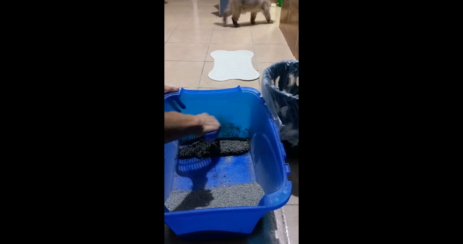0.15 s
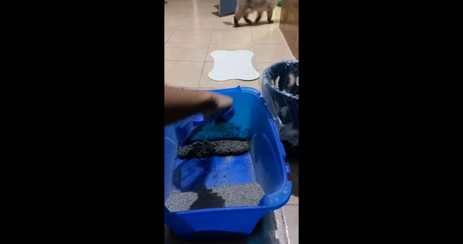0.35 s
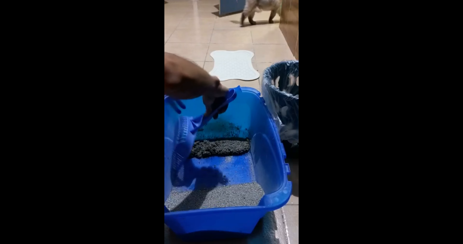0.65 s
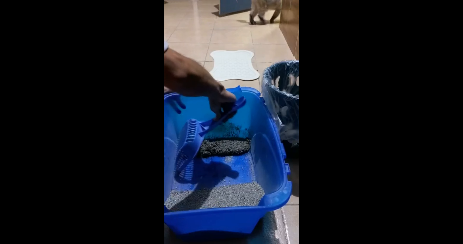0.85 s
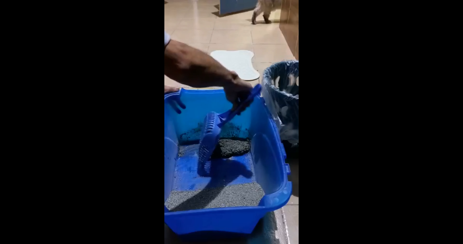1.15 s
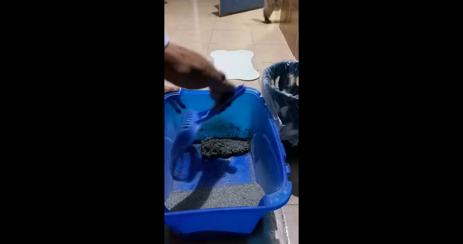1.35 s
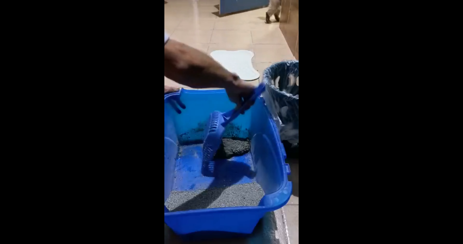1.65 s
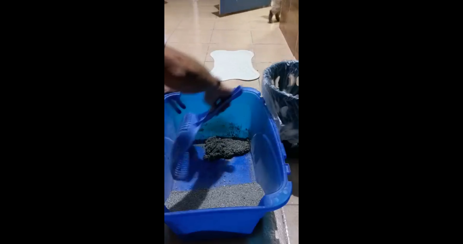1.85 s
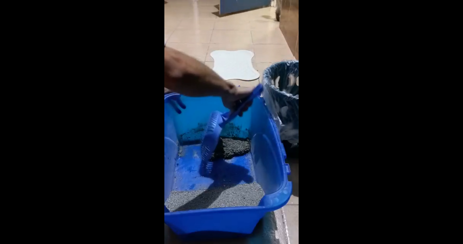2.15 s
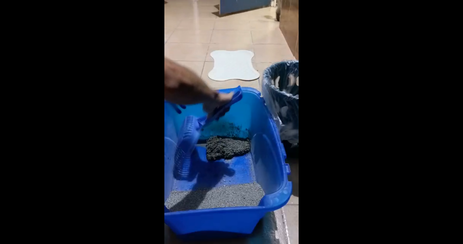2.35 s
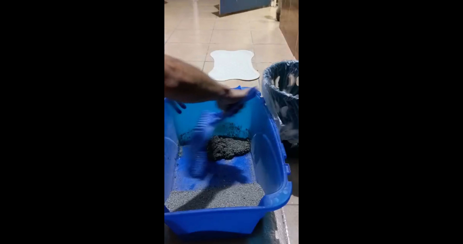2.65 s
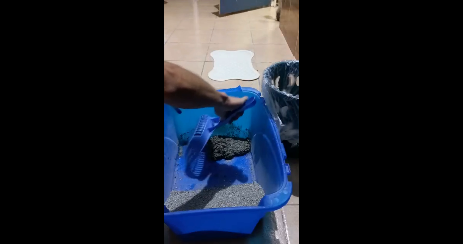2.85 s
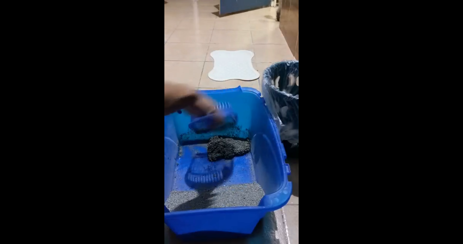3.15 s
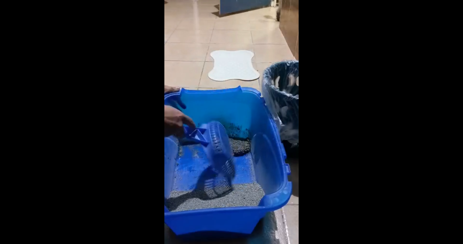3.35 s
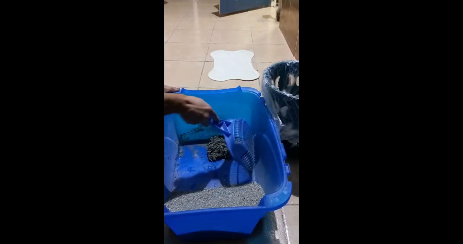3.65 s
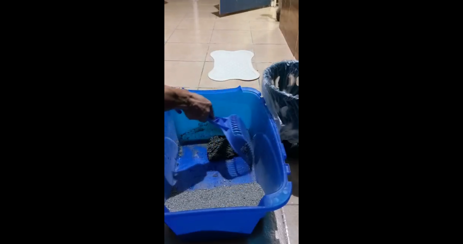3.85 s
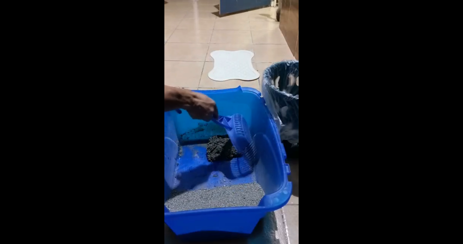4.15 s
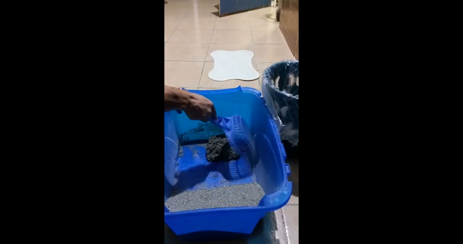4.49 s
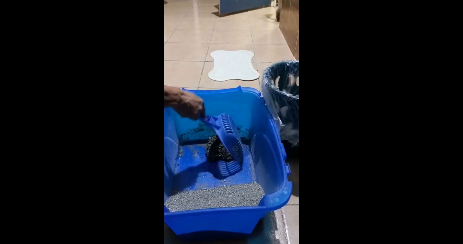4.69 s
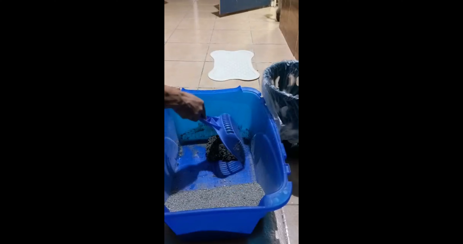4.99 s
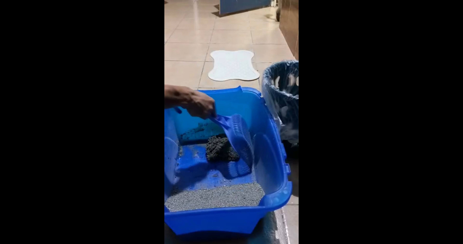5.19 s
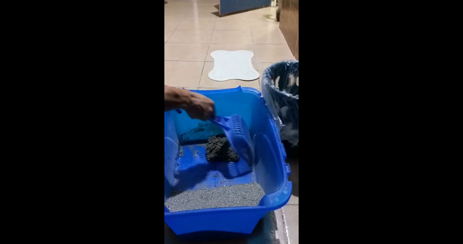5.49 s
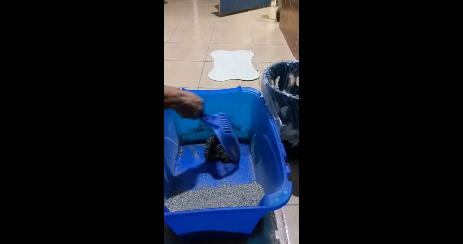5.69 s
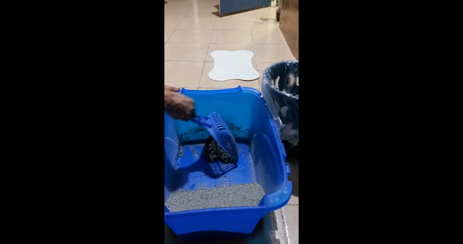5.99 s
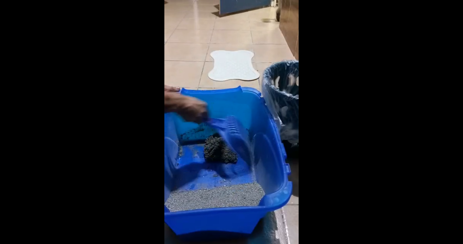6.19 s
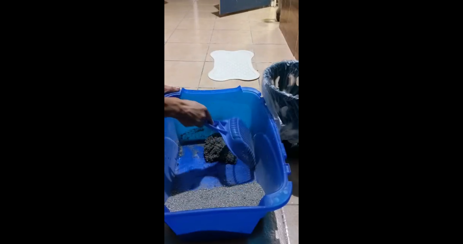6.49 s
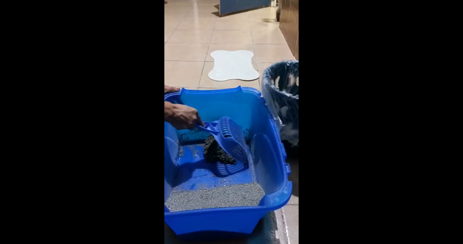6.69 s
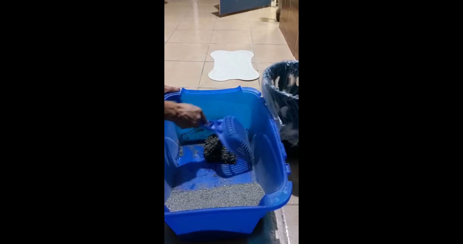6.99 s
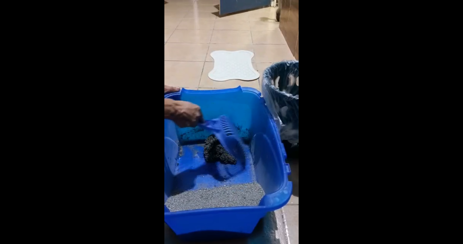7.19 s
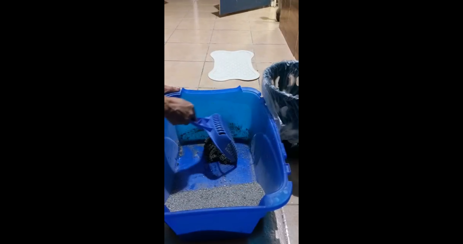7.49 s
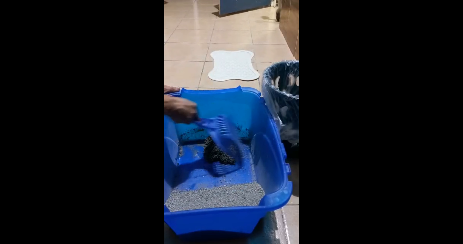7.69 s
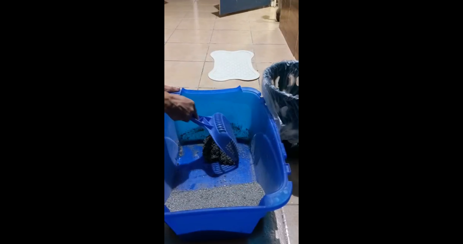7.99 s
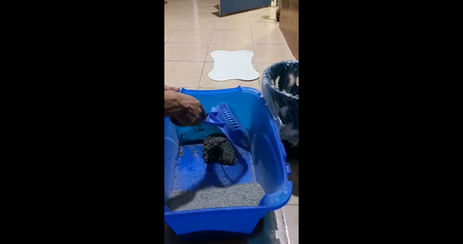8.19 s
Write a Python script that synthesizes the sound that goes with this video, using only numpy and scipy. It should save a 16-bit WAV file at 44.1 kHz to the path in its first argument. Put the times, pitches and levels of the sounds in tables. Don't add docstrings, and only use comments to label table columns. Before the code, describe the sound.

Close stereo pickup of litter being scooped in a small hard room. Gritty, dusty rasps ride on a hollow plastic tray resonance while the slotted blade chatters. The first three seconds hold uneven rakes, densest in the middle; after a near-silent gap with a very faint distant whine, brisk scrape-and-knock strokes repeat about three times a second, thinning to soft taps at the end.

```python
import sys
import numpy as np
from scipy import signal
from scipy.fft import rfft, irfft, next_fast_len
from scipy.io import wavfile
from scipy.ndimage import uniform_filter1d

SR = 44100
rng = np.random.default_rng(int(sys.argv[2]) if len(sys.argv) > 2 else 0)


def unload_audio(sound):
    columns = np.transpose(np.atleast_2d(sound))
    steps = np.round(np.clip(columns, -1, 1) * 32767)
    wavfile.write(sys.argv[1], SR, steps.astype(np.int16))


def ratio(d):
    e = np.asarray(d, float) / 20
    return 10 ** e


N = 367794

# (frequency [Hz], density [dB per Hz])
ROOM_TONE_SPECTRUM = [(30, -24), (49, -0.5), (95, 3), (161, -27.5), (364, -2.5), (461, -20.5), (700, -18),
                      (937, -18.5), (1910, -32.5), (6550, -32.5), (16000, -44.5)]
# (time [s], pitch [Hz], level [dB])
WHINE_TRACK = [
    (3.22, 1050, -105),
    (3.3, 1065, -87),
    (3.42, 1040, -77),
    (3.55, 1070, -78),
    (3.6, 1080, -105),
]
# (time [s], peak [dB])
EDGE_SNAPS = [(0.5581, -71), (0.8004, -46), (1.3538, -71), (1.4516, -63), (2.361, -38), (2.6343, -29),
              (2.818, -35), (3.5902, -60), (3.764, -51), (4.2435, -48), (4.5508, -37), (4.802, -57),
              (4.8358, -27), (5.148, -37), (5.463, -38.5), (5.7897, -61), (6.1352, -45), (6.8578, -64.5),
              (7.327, -42), (7.6031, -76), (7.9134, -67)]
# (frequency [Hz], density [dB per Hz])
DUST_SPECTRUM = [(4120, -24), (7000, -3), (8460, -16), (11800, -4), (15500, -8)]
# (frequency [Hz], density [dB per Hz])
GRIT_SPECTRUM = [(1120, -21), (1900, -2), (3450, -2), (3910, 0), (8000, -18.5), (10400, -118),
                 (17600, -120)]
# (frequency [Hz], width [Hz], level [dB])
RIB_MODES = [(2280, 130, -0.5), (2567, 150, -5), (3830, 100, -1.5), (4053, 106, -3.5)]
# (frequency [Hz], width [Hz], level [dB])
SCOOP_MODES = [(891, 225, 0), (942, 17, 9), (1080, 46, -3.5), (1304, 26.7, 5), (1193, 367, -4.5),
               (1470, 146, 3), (1648, 108, -0.5), (1836, 410, -5.5)]
# (frequency [Hz], width [Hz], level [dB])
ROCKING_MODES = [(79.3, 34, 2), (103.4, 30.5, 1)]
# (frequency [Hz], width [Hz], level [dB])
TRAY_MODES = [(197.4, 33.4, -8), (258, 10.4, -1), (309.7, 47, -7), (373.3, 22.2, 2.5), (510.3, 38, -3),
              (569.3, 67, -6), (700, 94, -11)]
# (time [s], push length [s], rattle [dB], grit
# [dB], dust [dB])
SCOOP_PUSHES = [(0.582, 0.087, -62.5, -63.5, -75), (0.822, 0.24, -45, -50.5, -58.5),
                (1.346, .06, -57, -55.5, -77), (1.511, 0.076, -40, -43, -49), (1.732, 0.088, -45.5, -46, -55),
                (1.958, 0.13, -39.5, -44, -49), (2.194, 0.063, -41.5, -50, -56.5),
                (2.274, 0.039, -48.5, -47.5, -54.5), (2.407, 0.11, -37.5, -42, -48.5),
                (2.624, 0.053, -44, -41.5, -46), (2.76, 0.1, -41, -47.5, -59),
                (2.936, 0.041, -54.5, -64.5, -92), (3.1, 0.065, -103, -100, -105),
                (3.37, 0.22, -73, -100, -105),
                (3.591, 0.086, -47.5, -56.5, -75), (3.767, 0.17, -58.5, -61, -73),
                 (4.105, 0.05, -49.5, -54, -60), (4.244, 0.067, -50, -54, -62),
                 (4.468, .017, -48.5, -51, -58.5), (4.585, 0.072, -49.5, -53.5, -59.5),
                 (4.798, 0.018, -48, -54, -59), (4.883, 0.094, -50, -52, -59.5),
                 (5.166, 0.13, -44.5, -49.5, -56), (5.455, 0.14, -46, -48, -55),
                 (5.812, 0.11, -43, -46.5, -51.5), (6.162, 0.11, -47.5, -49, -55.5),
                 (6.483, 0.019, -53.5, -54, -78), (6.648, 0.092, -51.5, -52, -66),
                 (6.867, 0.057, -51.5, -53, -59), (7.027, .09, -49.5, -49.5, -57.5),
                 (7.256, 0.02, -53, -54, -59.5), (7.297, 0.12, -44, -49.5, -56),
                 (7.517, 0.024, -58, -62.5, -80), (7.613, 0.11, -45, -49.5, -53),
                 (7.868, .03, -59.5, -70, -90), (8.046, 0.04, -55, -64, -88),
                 (8.15, 0.084, -75.5, -81.5, -105)]
# (time [s], rattle [dB], grit [dB], dust [dB])
BLADE_TOUCHES = [(0.0, -58.5, -60.5, -72), (.068, -45, -56, -59), (0.559, -51, -57, -66),
                 (.802, -55.5, -55, -77), (1.24, -59, -77, -80), (1.352, -52.5, -60, -74),
                 (1.452, -60, -51.5, -77), (1.726, -48.5, -56.5, -53), (2.359, -50.5, -48.5, -59),
                 (3.592, -48, -72, -78), (3.755, -56, -51.5, -73), (3.832, -52, -57, -60),
                 (4.244, -49.5, -43.5, -56), (4.459, -51, -57.5, -73), (4.55, -42.5, -49, -55),
                 (4.832, -39.5, -40.5, -42.5), (5.125, -57, -60, -70), (5.146, -51, -50, -47),
                 (5.464, -50, -62, -56), (5.786, -48, -48.5, -41.5), (6.136, -52, -61, -78),
                 (6.472, -57, -70, -85), (6.556, -51.5, -52, -52.5), (6.857, -41.5, -56.5, -90),
                 (6.76, -44, -73, -85), (7.032, -52.5, -54.5, -61), (7.326, -50, -51, -58),
                 (7.603, -36, -43.5, -77), (7.918, -43.5, -53, -75), (7.967, -52, -51, -53.5)]
# (time [s], hold [s], drum [dB], thud [dB])
SCOOP_LANDINGS = [(0.0, 0.0017, -59.5, -64), (0.067, 0.011, -41, -53), (0.554, 0.025, -45.5, -62.5),
                  (0.673, 0.014, -46, -70), (1.054, 0.02, -49, -69), (1.352, 0.036, -48.5, -59),
                  (1.87, 0.0048, -45.5, -51), (1.957, 0.015, -52.5, -74), (2.079, .02, -48.5, -54.5),
                  (2.275, 0.0082, -50, -72), (2.357, 0.004, -40.5, -60), (2.527, 0.038, -61.5, -67),
                  (2.945, 0.039, -51, -58.5), (3.591, 0.057, -36.5, -50.5), (4.102, 0.062, -52.5, -55),
                  (4.249, 0.0087, -49, -60), (4.463, 0.029, -43.5, -48), (4.55, 0.019, -50, -55),
                  (4.809, 0.02, -42, -43.5), (5.136, 0.023, -45, -59), (5.464, 0.036, -41.5, -46),
                  (5.783, .015, -44, -45.5), (6.135, 0.026, -53.5, -52.5), (6.2, 0.043, -46, -54.5),
                  (6.479, 0.026, -44, -54), (6.863, 0.045, -42.5, -50), (7.28, 0.017, -51.5, -49.5),
                  (7.602, 0.022, -33, -48), (7.911, 0.018, -41, -64), (8.076, 0.016, -56, -80)]
# (time [s], hold [s], drum [dB], thud [dB])
MORE_KNOCKS = [(0.224, 0.14, -101, -67), (1.398, 0.012, -43, -51.5), (2.538, 0.018, -43, -56),
               (3.662, 0.013, -47, -66), (3.761, 0.0087, -49.5, -66), (4.154, .012, -47, -48),
               (4.528, 0.011, -52.5, -50), (4.851, 0.011, -42.5, -48), (5.247, 0.0254, -57, -57.5),
               (6.764, 0.012, -47, -75), (6.915, 0.0089, -49, -47), (7.354, 0.0067, -44, -52),
               (7.414, 0.028, -47.5, -76), (7.543, 0.0085, -52, -74), (7.972, 0.0072, -54, -73)]
# (time [s], lift [dB])
BEARING_SPOT = [(.1, 0), (1.5, 0), (3.0, 0.7), (3.65, 3.5), (4.1, 0), (4.5, -1.5), (5.5, -0.7), (6.5, -2.5),
                (6.8, 1.5), (7.2, -0.2), (8.1, 2.5)]

# (swell [dB], fall [dB/s], drop before the tail [dB], tail [dB/s])
PUSH_RATTLE, PUSH_GRIT, PUSH_DUST = (29.5, 182, 47, 126), (12.8, 215, 25.3, 140), (15.5, 365, 45, 60)
TOUCH_RATTLE, TOUCH_GRIT, TOUCH_DUST = (18, 197, 56, 40), (2.6, 212, 43, 34), (23, 420, 30, 100)
LAND_DRUM, LAND_THUD = (4.7, 243, 11.9, 130), (6.3, 173, 24, 84)
TOUCH_S, THUD_LAG_S = 0.004, 0.0097
PUSH_HOLD = 0.13
DRUM_UNDER_PUSH_DB, THUD_UNDER_PUSH_DB = -7.5, -28
LIFT_DB, PUSH_LIFT_DB, LIFT_PER_DB = -1, 5, -0.13
BLOW_DB, BLOW_CONTACT_S = 14.5, 0.0019
ROOM_T60_S, WALL_CUT_HZ, ROOM_DB, ROOM_TONE_DB = 0.14, 6000, -15, -72


def rms_one(x):
    return x / np.sqrt(np.mean(x ** 2) + 1e-20)


def in_time(rows):
    time_s, *columns = np.transpose(rows)
    return [np.interp(np.arange(N) / SR, time_s, column) for column in columns]


def at_hz(points, hz):
    point_hz, point_db = np.transpose(points)
    return np.interp(np.log(hz), np.log(point_hz), point_db)


def drift(rate_hz):
    r = np.exp(-80 * np.pi * rate_hz / SR)
    noise = rng.standard_normal(N // 40 + 2002)
    slow = signal.lfilter([1], [1, -2 * r, r * r], noise)[2000:]
    return np.interp(np.arange(N) / 40, np.arange(len(slow)), rms_one(slow))


def band(x, low_hz, high_hz):
    return signal.sosfilt(signal.butter(1, [low_hz, high_hz], "band", fs=SR, output="sos"), x)


def resonate(x, hz, width_hz):
    r = np.exp(-np.pi * width_hz / SR)
    poles = [1, -2 * r * np.cos(2 * np.pi * hz / SR), r * r]
    return signal.lfilter([(1 - r * r) / 2, 0, (r * r - 1) / 2], poles, x + 1e-18)


def contacts(uneven_db, lag_s, scatter_s, count):
    at = rng.integers(0, N, count)
    sizes = ratio(uneven_db * np.minimum(rng.exponential(1, count), 4)) * rng.choice([-1, 1], count)
    late = np.round((lag_s + scatter_s * rng.standard_normal(count)) * SR).astype(int)
    left = np.bincount(np.clip(at + late, 0, N - 1), sizes, N)
    right = np.bincount(at, sizes, N)
    return rms_one(np.array([left, right]))


def strokes(start_s, length_s, peak_db, swell_db, fall, knee_db, tail, hold=0):
    t = np.arange(0, N + 21, 20) / SR
    power = np.full(len(t), 1e-12)
    for s, length, db in zip(start_s, np.maximum(length_s, 1e-3), peak_db):
        top = s + length * (1 - hold)
        release = s + length * (1 + hold)
        knee = release + abs(knee_db / fall)
        times = [s - 1e-3, s, top, release, knee, knee + 10]
        levels_db = [-150, db - swell_db, db, db, db - knee_db, db - knee_db - 10 * tail]
        power += ratio(2 * np.interp(t, times, levels_db))
    return np.interp(np.arange(N) / 20, np.arange(len(t)), power)


def efforts():
    start, length, *push_db = np.transpose(SCOOP_PUSHES)
    push_laws = (PUSH_RATTLE, PUSH_GRIT, PUSH_DUST)
    pushes = [strokes(start, length, db, *law, hold=PUSH_HOLD) for db, law in zip(push_db, push_laws)]

    at, *touch_db = np.transpose(BLADE_TOUCHES)
    touch_laws = (TOUCH_RATTLE, TOUCH_GRIT, TOUCH_DUST)
    touches = [strokes(at, 0 * at + TOUCH_S, db, *law) for db, law in zip(touch_db, touch_laws)]

    down, hold, drum_db, thud_db = np.transpose(SCOOP_LANDINGS + MORE_KNOCKS)
    pushed = pushes[0] * ratio(2 * DRUM_UNDER_PUSH_DB)
    drum = strokes(down, hold, drum_db, *LAND_DRUM) + pushed
    thud = strokes(down, hold + THUD_LAG_S, thud_db, *LAND_THUD)
    thud = thud + pushes[0] * ratio(2 * THUD_UNDER_PUSH_DB)

    levels_db = 10 * np.log10([drum, thud, *np.add(pushes, touches)])
    lift_db = LIFT_DB + in_time(BEARING_SPOT)[0] + PUSH_LIFT_DB * pushed / drum
    lift_db = lift_db + LIFT_PER_DB * np.maximum(levels_db[0] + 37, -10)
    return (*levels_db, lift_db)


def room_tone():
    hz = np.maximum(np.fft.rfftfreq(N, 1 / SR), 1)
    mid, side = rfft(rng.standard_normal((2, N))) * ratio(at_hz(ROOM_TONE_SPECTRUM, hz))
    apart = np.clip(hz / 900, 0, 1)
    return rms_one(irfft([mid + apart * side, mid - apart * side], N)) * ratio(ROOM_TONE_DB)


def whine():
    hz, level_db = in_time(WHINE_TRACK)
    tone = np.sin(2 * np.pi * np.cumsum(hz + 14 * drift(31.8)) / SR)
    return np.sqrt(2) * tone * ratio(level_db + 5 * drift(31))


def room(x):
    size = next_fast_len(N + SR)
    phase = -2j * np.pi * np.fft.rfftfreq(size)
    dull = np.exp(-2 * np.pi * WALL_CUT_HZ / SR)
    wall = (1 - dull) / (1 - dull * np.exp(phase))
    answer = np.zeros((2, len(phase)), complex)
    for k, lag in enumerate((rng.uniform(0.0057, 0.035, 12) * SR).astype(int)):
        loop = ratio(-60 * lag / SR / ROOM_T60_S) * wall * np.exp(phase * lag)
        answer[k % 2] += loop / (1 - loop) * (-1) ** (k // 2)
    return irfft(answer * rfft(x, size), size)[:, :N]


def snaps():
    onset = np.zeros(N)
    onset[[round(s * SR) for s, db in EDGE_SNAPS]] = ratio(np.array(EDGE_SNAPS)[:, 1] - 10.0)
    crack = signal.lfilter([1], [1, -ratio(-60 / (0.065 * SR))], onset)
    spray = signal.lfilter([1], [1, -ratio(-60 / (0.07 * SR))], onset)
    burst = contacts(3.3, lag_s=0.00065, scatter_s=0.00004, count=200000) * (crack + ratio(1) * spray)
    click = np.array([np.roll(onset, round(0.00025 * SR)), onset])
    return band(burst + ratio(20) * click, 800, 7000)


def crunch(level_db):
    clicks = contacts(4.9, lag_s=0.0003, scatter_s=0.00005, count=1600)
    return rms_one(band(clicks, 1000, 7000)) * ratio(level_db)


def grains(spectrum, level_db, uneven_db, cycles, patchy_db, size, count):
    out = 0
    for hz in np.geomspace(spectrum[0][0], min(spectrum[-1][0], 15500), size)[1:]:
        clicks = contacts(uneven_db, lag_s=0.00025, scatter_s=0.00012, count=count)
        gain_db = at_hz(spectrum, hz) + patchy_db * drift(22.4)
        out = out + resonate(clicks * ratio(gain_db), hz, hz / cycles)
    return rms_one(out) * ratio(level_db)


def body(force, level_db, modes, wander_db, wander_rate, steady=0.65, lift_db=0):
    sound = 0
    for k, (hz, width_hz, db) in enumerate(modes):
        upper = np.tanh(np.log(hz / 440) * 3.0)
        gain_db = db + upper * lift_db + wander_db * drift(wander_rate)
        sound = sound + (-1) ** k * resonate(force * ratio(gain_db), hz, width_hz)
    swell = uniform_filter1d(np.mean(sound ** 2, axis=0), size=1200) + 1e-12
    return rms_one(sound / swell ** (steady / 2)) * ratio(level_db)


def blows():
    time_s, hold_s, drum_db, thud_db = np.transpose(SCOOP_LANDINGS + MORE_KNOCKS)
    hits = np.zeros(N)
    hits[(time_s * SR).astype(int)] = ratio(drum_db + BLOW_DB)
    hits = np.convolve(hits, np.hanning(round(BLOW_CONTACT_S * SR) + 3))[:N]
    return sum((-1) ** k * resonate(hits * ratio(db), hz, width_hz)
               for k, (hz, width_hz, db) in enumerate(TRAY_MODES))


def to_ports(x, left_db):
    return x * ratio([[left_db], [-left_db]])


def scene():
    drum_db, thud_db, rattle_db, grit_db, dust_db, lift_db = efforts()
    rub = contacts(4.87, lag_s=0.0001, scatter_s=0.00024, count=12000)
    chatter = contacts(2.5, lag_s=0.00034, scatter_s=0.00017, count=25000)

    dust = grains(DUST_SPECTRUM, dust_db + 0.5, 1.5, cycles=7.7, patchy_db=3.5, size=8, count=25000)
    grit = grains(GRIT_SPECTRUM, grit_db + 1.9, 2.2, cycles=5.7, patchy_db=-0.5, size=13, count=12000)
    ribs = body(chatter, grit_db - 8.5, RIB_MODES, wander_db=3.0, wander_rate=22.0)
    scoop = body(chatter, rattle_db + 0.17, SCOOP_MODES, wander_db=4.0, wander_rate=10.7)
    thud = body(rub, thud_db + 0.79, ROCKING_MODES, wander_db=-3.0, wander_rate=6.7)
    tray = body(rub, drum_db + 1.5, TRAY_MODES, wander_db=1.58, wander_rate=2.9, steady=0.24,
                lift_db=lift_db)

    near = snaps() + crunch(grit_db - 13) + ribs
    near = near + to_ports(dust, -1.8) + to_ports(grit, 0.3) + to_ports(scoop, 1.8)
    near = near + to_ports(thud, 0.8) + to_ports(tray + blows(), 1.5)
    return near + ratio(ROOM_DB) * room(near.mean(axis=0)) + whine() + room_tone()


def top_cut(x):
    return signal.sosfilt(signal.butter(12, 16650, fs=SR, output="sos"), x)


def record(dry):
    heard = signal.sosfilt(signal.butter(2, 35, "high", fs=SR, output="sos"), dry)
    heard = signal.sosfilt(signal.cheby2(14, 45, 16150, fs=SR, output="sos"), heard)
    return top_cut(heard)


dry = scene()
out = record(dry)
unload_audio(out)
```